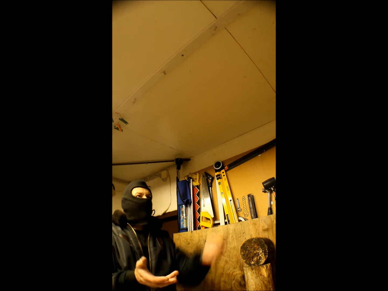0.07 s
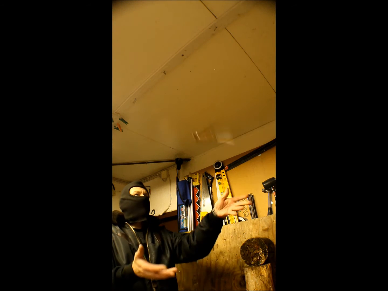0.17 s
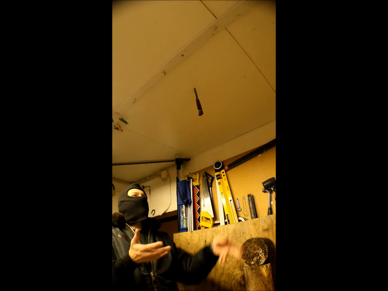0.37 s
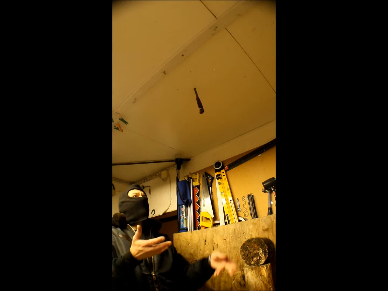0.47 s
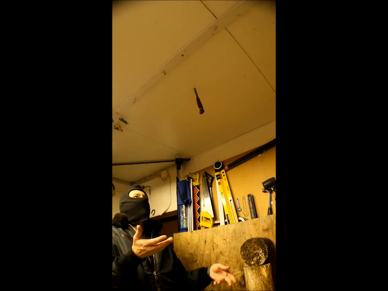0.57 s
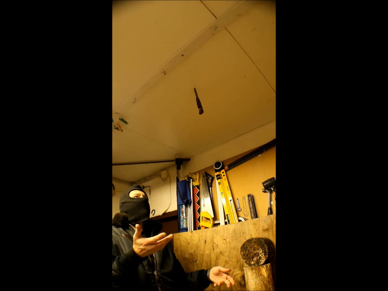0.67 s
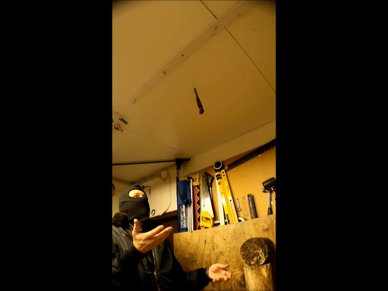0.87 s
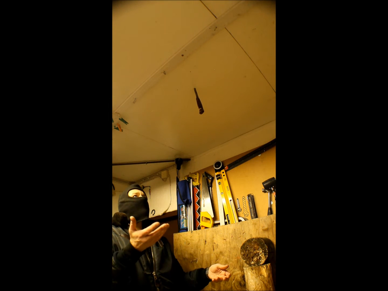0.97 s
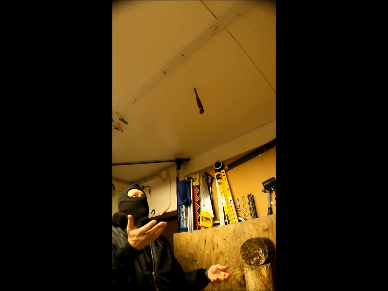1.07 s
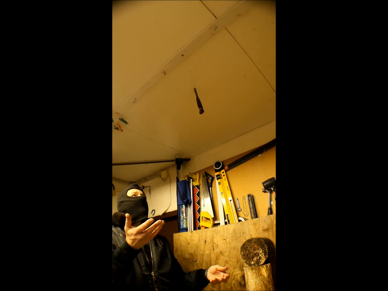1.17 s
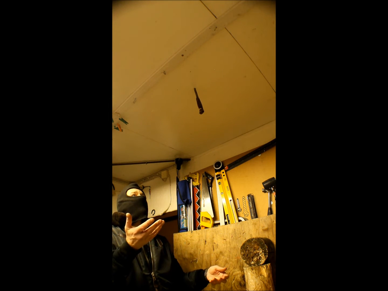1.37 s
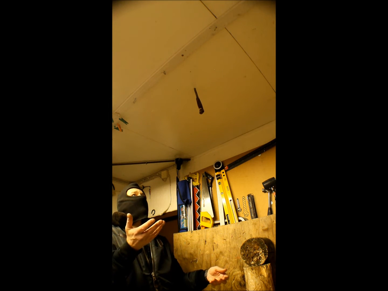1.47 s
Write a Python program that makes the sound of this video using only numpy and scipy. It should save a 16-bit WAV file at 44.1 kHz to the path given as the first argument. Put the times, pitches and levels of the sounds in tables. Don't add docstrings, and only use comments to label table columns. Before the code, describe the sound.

A knife flicked upward slams into a wooden ceiling panel with a sharp, overloaded thud; a faint sleeve swish and steel scrape precede it, a short ring, rattle and splinter ticks follow in a small workshop.

```python
import sys
import numpy as np
from scipy import signal
from scipy.fft import rfft, irfft, next_fast_len
from scipy.io import wavfile
from scipy.ndimage import map_coordinates

SR = 44100
rng = np.random.default_rng(int(sys.argv[2]) if len(sys.argv) > 2 else 0)


def waveform_to_disk(signal):
    frames = np.transpose(np.atleast_2d(signal))
    scaled = np.clip(frames, -1, 1) * 32767
    samples = np.round(scaled).astype(np.int16)
    wavfile.write(sys.argv[1], SR, samples)


def how_loud(loudness_db):
    steps = np.asarray(loudness_db, float) / 20
    return 10 ** steps


N = 66150
TIME = np.arange(N) / SR

# t/s, ring level/dB, clatter level/dB, clatter hold/s, clatter t60/s
KNIFE_CONTACTS = [
    (0.2036, -32, -22.5, 0.0023, .04),
    (.2076, -21.5, -21.5, 0.0066, 0.1),
    (.369, -17, 5, .009, .014),
    (.369, -17, -7.5, .013, .075),
    (0.4544, -26, -25.5, 0.0054, 0.068),
]
# f/Hz, level/dB, t60/s
FREE_BLADE = [(2685, -0.5, 0.11), (2710, -4, .17), (3315, -1.5, 0.084), (4945, -4.5, 0.082),
              (5360, -2, .11), (5400, -3.5, .09), (5920, -10, 0.063), (6600, -7, 0.055), (6940, 0, 0.047),
              (8560, -6, .1), (8730, 0, 0.1), (10700, -1.5, 0.082), (11800, -9, .06), (14500, -2, .04)]
# f/Hz, level/dB, t60/s
STUCK_BLADE = [(1060, -14, .25), (1430, -3, .28), (2200, -14, .15), (2690, -7, .22), (2778, 1, .32),
               (3240, -14, .15), (3950, -6, .08), (4800, -4, .07), (5265, -1, .09), (6310, -5, .07),
               (7730, -5, .06), (8800, -5, .08), (10490, -10, .07), (12410, -9, .06)]
# f/Hz, level/dB, t60/s
LOOSE_BLADE = [(1045, -2, 0.16), (1426, -3.5, 0.12), (1750, -9, 0.066), (2814, -6, 0.055),
               (3198, -4, 0.083), (5000, 0.5, 0.051), (5100, 3.5, 0.052), (5430, -2, 0.054),
               (6550, -10, 0.064), (7100, -3.5, .066), (8100, -6, .07), (8750, -6.5, 0.1)]
# f/Hz, level/dB per Hz
RELEASE_COLOUR = [(290, -45), (500, -14), (1310, -18), (2730, -1.5), (3800, -12), (5300, -0.5),
                  (8700, -7.5), (15600, -23)]
# f/Hz, level/dB per Hz
IMPACT_COLOUR = [(300, -46), (600, -11.5), (1400, -5), (2850, -5.5), (5140, -1), (9670, -7.5),
                 (12000, -6.5), (15600, -3.5)]
# f/Hz, level/dB per Hz
REBOUND_COLOUR = [(500, -45), (1100, 4), (2000, -9), (3100, -4.5), (4100, -25), (5400, -7), (7200, -14),
                  (11000, -34)]
# t/s, level/dB, lowest f/Hz
SPLINTER_TICKS = [(.4311, -22, 9000), (.4388, -28, 9000), (.5128, -38, 13000), (.5185, -38, 11000),
                  (.5398, -38, 12000), (.5450, -23, 12500), (.5748, -37, 12000), (.5827, -20, 14000),
                  (.5929, -16, 11500), (.5986, -24, 12500)]
# t/s, level/dB
CEILING_BLOWS = [
    (.3755, -16.5),
    (.3796, -9.5),
    (.4535, -35),
]
# f/Hz, level/dB, t60/s
JOIST_MODES = [(37, -11, .9), (60, 0, .14), (76, -9, .25)]
# f/Hz, level/dB, t60/s
PANEL_MODES = [(161, -15, .3), (188, -4, .16), (205, -6, .17), (254, 0, .1), (309, 3, .085),
               (398, -3, .085), (436, -12, .1), (540, -22, .15)]
# f/Hz, level/dB per Hz
RUMBLE_COLOUR = [(11, -15), (20, -15), (40, -3.5), (70, -7.5), (100, -15), (160, -17), (250, -20),
                 (400, -56)]
# t/s, level/dB
SLEEVE_MOTION = [(0, -53), (.07, -48.5), (.12, -41), (.2, -39.5), (.26, -37), (.295, -50), (.36, -41),
                 (.5, -45), (.58, -46), (.68, -42.5), (.74, -46), (.85, -51), (1.0, -50.5), (1.15, -67)]
# f/Hz, level/dB per Hz
CLOTH_COLOUR = [(71, -38), (120, -13), (280, -5.5), (404, -3.5), (561, -5.5), (961, -3.5), (1260, -7.5),
                (12000, -27.5), (15600, -65), (22000, -120)]
# t/s, level/dB
FINGER_SLIDE = [(.1, -65), (.14, -44.5), (.165, -35), (.2, -30.5), (.235, -37.5), (.26, -46), (.29, -46)]
# f/Hz, level/dB per Hz
SKIN_COLOUR = [(240, -46), (400, -15), (1150, -12.5), (1300, -7.5), (1690, -11), (2590, -12), (3160, -14.5),
               (5920, -22.5), (15500, -35)]
# t/s, level/dB, f/Hz, t60/s
HAND_TOUCHES = [(.108, -36, 400, 0.063), (.12, -30, 468, 0.087), (.13, -33, 553, 0.057),
                (.1652, -28.5, 5650, 0.074), (.1655, -28, 5000, .045), (0.178, -24, 1296, 0.13),
                (0.179, -35, 2590, .06), (.19, -29, 2130, 0.11), (0.213, -29, 203, .09),
                (.253, -32, 415, 0.08), (.257, -41, 810, 0.077), (0.676, -40, 399, 0.15)]
# f/Hz, level/dB per Hz
HISS_COLOUR = [(15, -22), (50, -3.5), (62, 2), (85, -9.5), (200, -5), (700, -7.5), (3000, -11),
               (8000, -18.5), (15800, -21.5)]


def knife():
    bodies = [(FREE_BLADE, RELEASE_COLOUR), (FREE_BLADE, RELEASE_COLOUR),
              ([], IMPACT_COLOUR),
              (STUCK_BLADE, IMPACT_COLOUR), (LOOSE_BLADE, REBOUND_COLOUR)]
    return sum(contact(row, modes, colour) for row, (modes, colour) in zip(KNIFE_CONTACTS, bodies))


def contact(row, modes, colour):
    start_s, ring_db, clatter_db, hold_s, t60_s = row
    grit = unit(noise(colour) * how_loud(1.7 * wobble(500)))
    clatter = how_loud(clatter_db) * strike(start_s, 0.00019, hold_s, t60_s) * grit
    blade = how_loud(ring_db) * ring(start_s, modes, rise_s=0.00056, waver=0.82, rate_hz=22.5)
    return clatter + blade


def splinters():
    out = np.zeros(N)
    for start_s, db, low_hz in SPLINTER_TICKS:
        def thin(hz):
            return np.minimum(hz / low_hz, 1) ** 4.5 + 0.13 * (hz > 3000)

        snap = np.sign(rng.standard_normal(N)) * strike(start_s, 0.0001, 0, 0.0045)
        fizz = how_loud(-18) * rng.standard_normal(N) * strike(start_s, 0.00073, 0, 0.07)
        out += how_loud(db + 4.5) * filtered(snap + fizz, thin)
    return out


def hand():
    swish = how_loud(level(SLEEVE_MOTION) + 0.61 * wobble(39.8) + 1.87 * wobble(300)) * noise(CLOTH_COLOUR)
    slide = how_loud(level(FINGER_SLIDE) + 1.3 * wobble(78.2) + 1.6 * wobble(388.3)) * noise(SKIN_COLOUR)
    touches = sum(ring(start_s, [(hz, db, t60_s)], rise_s=0.0016, waver=0.73, rate_hz=30 + hz / 30)
                  for start_s, db, hz, t60_s in HAND_TOUCHES)
    return swish + slide + touches


def ceiling():
    bodies = [JOIST_MODES, PANEL_MODES, PANEL_MODES]
    boom = sum(how_loud(db) * ring(start_s, modes, rise_s=0.0007, waver=0.03, rate_hz=15)
               for (start_s, db), modes in zip(CEILING_BLOWS, bodies))
    first_blow_s = CEILING_BLOWS[0][0]
    rumble = how_loud(-36) * strike(first_blow_s, 0.006, 0.043, 0.9) * noise(RUMBLE_COLOUR)
    return boom + rumble


def workshop(near):
    dull = unit(filtered(rng.standard_normal(N), lambda hz: 1 / (1 + hz / 3800)))
    tail = dull * strike(0.0057, 0.0024, 0, 0.22)
    return signal.fftconvolve(near, tail / np.linalg.norm(tail))[:N]


def hiss():
    return how_loud(-46.5) * noise(HISS_COLOUR)


def ring(start_s, modes, rise_s, waver, rate_hz):
    out = np.zeros(N)
    start = int(start_s * SR) + 1
    for hz, db, t60_s in modes:
        t = TIME[start:start + int(t60_s * SR)] - start_s
        size_waver = waver * wobble(rate_hz + hz / 45, len(t))
        phase = waver * wobble(rate_hz + hz / 45, len(t))
        size = how_loud(db + 4.6 * np.tanh(size_waver) - 60 * t / t60_s) * (1 - np.exp(-t / rise_s))
        out[start:start + len(t)] += size * np.sin(2 * np.pi * hz * t + phase)
    return out


def strike(start_s, rise_s, hold_s, t60_s):
    t = np.maximum(TIME - start_s, 0)
    return (1 - np.exp(-t / rise_s)) * how_loud(-60 * np.maximum(t - hold_s, 0) / t60_s)


def level(rows):
    s, db = np.transpose(rows)
    return np.interp(TIME, s, db, left=-90, right=-90)


def wobble(rate_hz, size=N):
    knots = rng.standard_normal(int(N * rate_hz / SR) + 4)
    return map_coordinates(knots, [TIME[:size] * rate_hz])


def noise(colour):
    f, db = np.transpose(colour)

    def response(hz):
        return how_loud(np.interp(np.log(hz + 1), np.log(f + 1), db))

    return unit(filtered(rng.standard_normal(N), response))


def filtered(x, response):
    m = next_fast_len(N + SR // 2)
    return irfft(rfft(x, m) * response(np.fft.rfftfreq(m, 1 / SR)), m)[:N]


def unit(x):
    return x / np.sqrt(np.mean(x ** 2) + 1e-20)


def scene():
    near = knife() + splinters()
    room = how_loud(-24.5) * workshop(near)
    return (near + room + ceiling() + hand() + hiss())[None]


def top_cut(x):
    return signal.sosfilt(signal.butter(12, 15690, fs=SR, output="sos"), x)


def record(dry):
    mix = dry / (1 + np.abs(dry / 0.94) ** 12) ** (1 / 12)
    return top_cut(mix)


dry = scene()
out = record(dry)
waveform_to_disk(out)
```